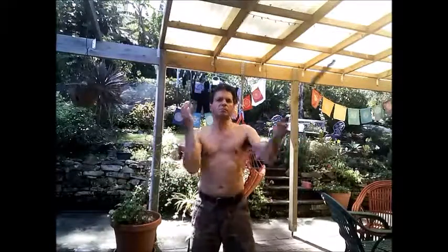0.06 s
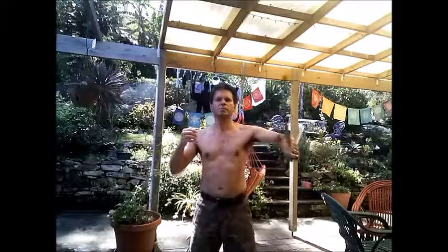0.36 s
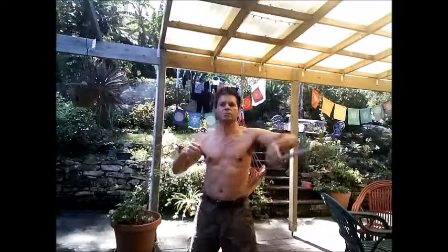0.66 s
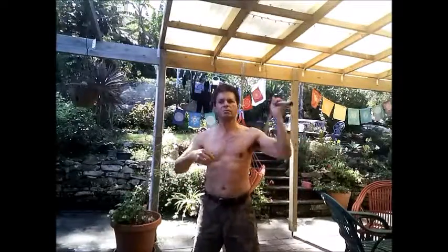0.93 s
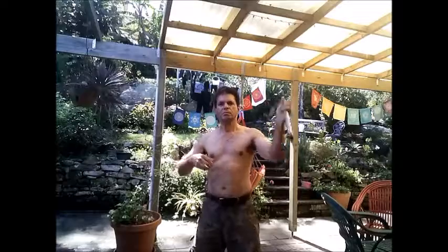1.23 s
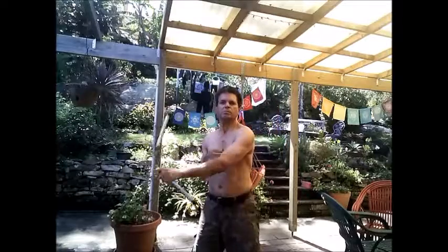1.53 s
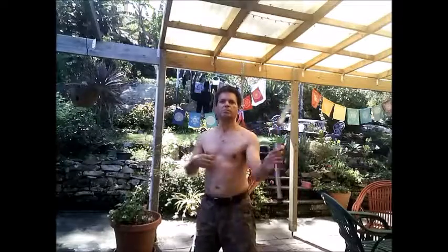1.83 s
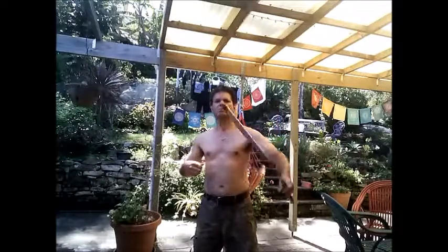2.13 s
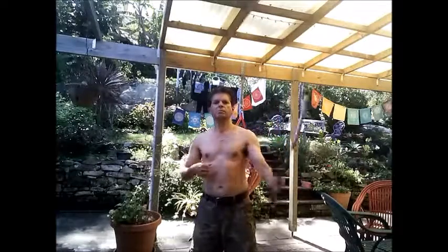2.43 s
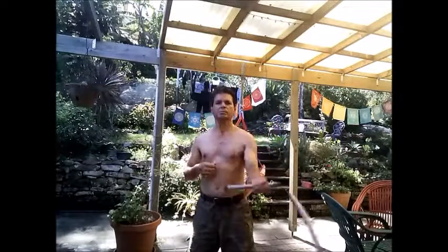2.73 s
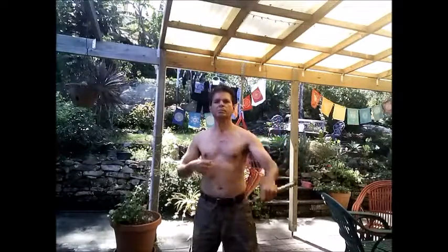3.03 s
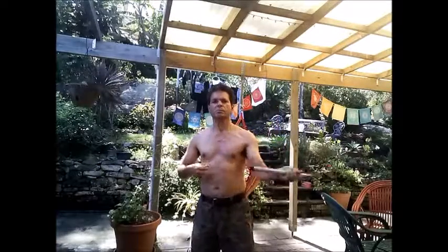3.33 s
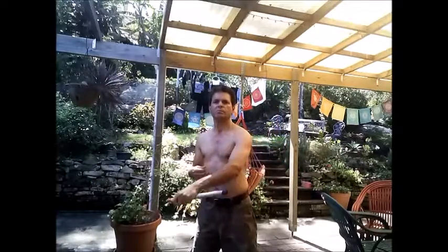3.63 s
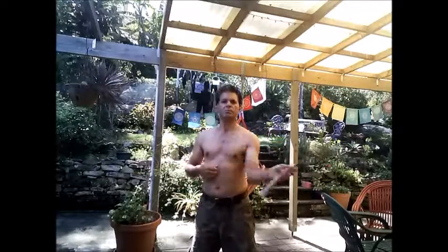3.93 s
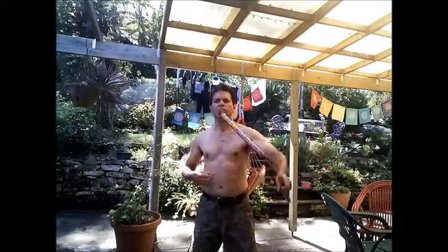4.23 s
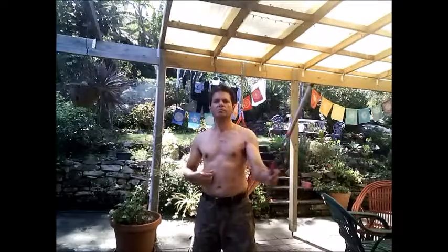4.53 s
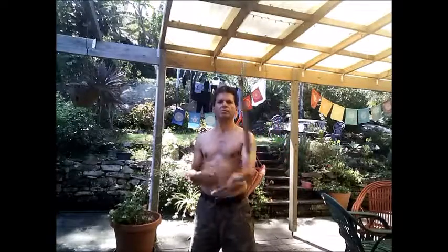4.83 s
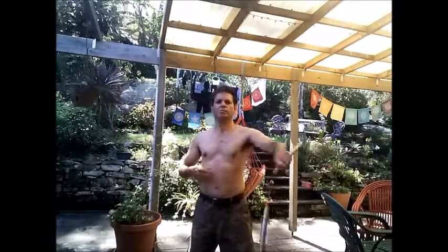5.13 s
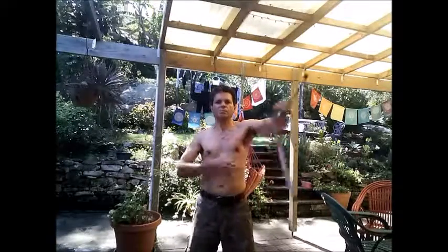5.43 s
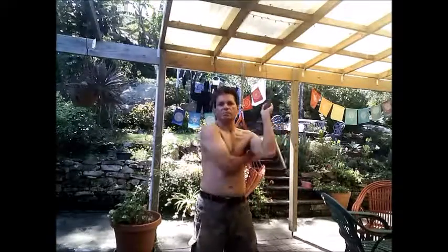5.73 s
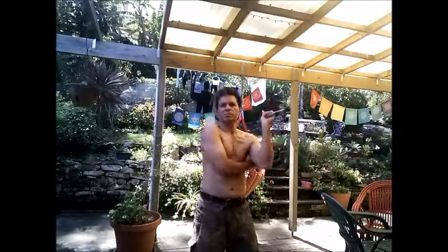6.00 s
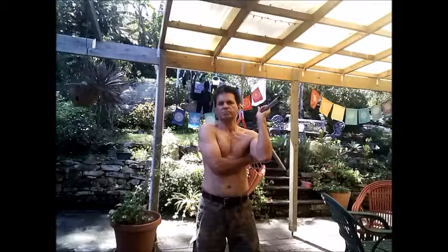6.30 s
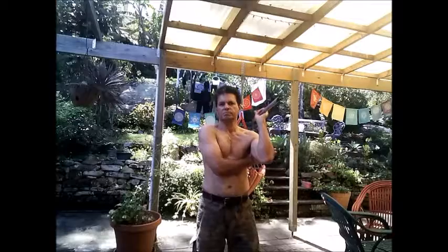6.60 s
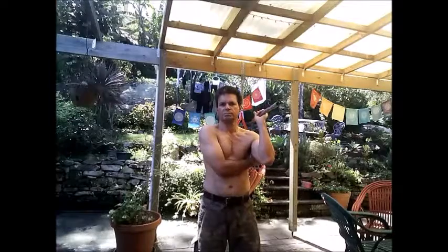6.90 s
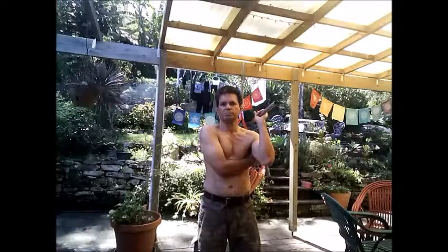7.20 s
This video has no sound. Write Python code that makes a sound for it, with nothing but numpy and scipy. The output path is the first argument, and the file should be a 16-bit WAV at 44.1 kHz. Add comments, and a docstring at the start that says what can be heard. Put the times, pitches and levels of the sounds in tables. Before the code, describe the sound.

Nunchaku are swung on a roofed garden patio, a few metres from a small microphone, with a short reverberation. From the start until about 6 seconds, the chain catches and bounces in quick, irregular clicks and gritty rattles, several each second, coloured by the wooden handles. Faint low whooshes pass at about 0.2, 1.5, 2.6, 4 and 4.8 seconds. Brief thin squeaks and faint high chirps fall in between, and soft dull pats come near 0.3 and 4.3 seconds. At 3.5 seconds the handles strike together in a sharp clack, the loudest sound, over a low thud. A second, thinner clack follows at 6 seconds. The chain gives two weak rattles around 6.3 seconds and a tiny tick at 6.7, then rests. Throughout lie a faint outdoor rumble, a low electronic hum and a slowly growing high whine.

```python
"""On a roofed garden patio, nunchaku are swung and spun a few metres from a small camera.
The chain runs out, catches and bounces, exciting the resonances of the wooden handles, which twice
clack together. Fast swings shed eddies that give a low whoosh; dull pats, thin squeaks and faint chirps
come between. The patio adds early reflections and a short reverberant tail. Beneath it all lie a faint
outdoor rumble and the hum and pulsing whine of the camera's electronics."""
import sys
import numpy as np
from scipy import signal
from scipy.fft import rfft, irfft
from scipy.io import wavfile
from scipy.ndimage import uniform_filter1d

SR = 44100
rng = np.random.default_rng(int(sys.argv[2]) if len(sys.argv) > 2 else 0)


def int16_out(signal):
    """Quantize to a 16-bit WAV file."""
    q = np.round(np.clip(np.atleast_2d(signal).T, -1, 1) * 32767)
    wavfile.write(sys.argv[1], SR, q.astype(np.int16))


N = 320166
TIME = np.arange(N) / SR
TAPS = 4096
HZ = np.fft.rfftfreq(TAPS, 1 / SR)


def amp(db):
    """The decibel law: amplitude grows tenfold for every 20 dB."""
    return 10 ** (np.asarray(db) / 20)


def unit(x):
    """Normalisation to an rms of 1."""
    return x / np.sqrt(np.mean(x ** 2) + 1e-20)


def curve(points, hz):
    """Interpolation of (Hz, value) points on a log-frequency axis."""
    point_hz, value = np.transpose(points)
    return np.interp(np.log(hz + 1), np.log(point_hz + 1), value)


def resonance(hz, width_hz):
    """A Lorentzian resonance curve of height 1."""
    return 1 / (1 + (2 * (HZ - hz) / width_hz) ** 2)


def shelf(hz, order):
    """A high-pass transition from 0 below hz to 1 above."""
    return 1 - 1 / (1 + (HZ / hz) ** order)


def add(mix, start, sound):
    """Superposition: a sound joins the mix at its start in seconds."""
    part = mix[max(round(start * SR), 0):][:len(sound)]
    part += sound[:len(part)]


def colour(x, db):
    """Minimum-phase filtering by the gain db at each of HZ: peaks ring after a blow, never before."""
    log_gain = np.log(amp(np.r_[db, db[-2:0:-1]]))
    response = np.fft.ifft(np.exp(np.conj(signal.hilbert(log_gain)))).real
    return signal.fftconvolve(x, response[:TAPS // 2])[:len(x)]


def noise(spectrum):
    """Spectral shaping of white noise, at an rms of 1."""
    gain = amp(curve(spectrum, np.fft.rfftfreq(N, 1 / SR)))
    return unit(irfft(rfft(rng.standard_normal(N)) * gain, N))


# The outdoor rumble. Each row: frequency in Hz, relative spectral density in dB.
GARDEN_SPECTRUM = [(20, -39), (40, -9), (75, 0.5), (120, -1.5), (230, -4.5), (450, -11.5), (1000, -17),
                   (2000, -20), (3700, -22), (4600, -25.5), (9000, -27), (11500, -42.5), (16000, -43)]

def garden(level_db=-57):
    """Ambient noise: steady, with its greatest density in the bass."""
    return amp(level_db) * noise(GARDEN_SPECTRUM)


# The pulsing part of the whine. Each row: frequency in Hz, relative spectral density in dB.
WHINE_SPECTRUM = [(5500, -46), (7000, -21), (7700, -16), (8250, -3), (8650, -11.5), (9000, -21),
                  (9550, -11.5), (10200, -34), (12000, -39)]
# The slow growth of the whine. Each row: time in seconds, level in dB.
WHINE_ENVELOPE = [(0, -89), (.9, -75.5), (2.5, -65.5), (3.6, -66), (6, -63.5), (7.2, -62)]

def camera(hum_hz=86.8, hum_db=-67, steady_db=-2, pulse_width=0.16):
    """Amplitude modulation: the electronics hum, and part of their high whine pulses with the hum."""
    cycles = hum_hz * TIME
    hum = amp(hum_db) * np.sqrt(2) * np.sin(2 * np.pi * cycles)
    pulse = np.exp(-(((cycles - .4) % 1 - .5) / pulse_width) ** 2)
    steady = unit(colour(rng.standard_normal(N), 20 * np.log10(resonance(8250, width_hz=800))))
    pulsing = unit(noise(WHINE_SPECTRUM) * pulse)
    whine = unit(pulsing + amp(steady_db) * steady)
    return hum + whine * amp(np.interp(TIME, *np.transpose(WHINE_ENVELOPE)))


# The patio's early reflections. Each row: mean delay in seconds, gain relative to the direct sound.
REFLECTIONS = [(.0016, 0.18), (.0043, 0.18), (.0062, 0.18), (0.013, 0.078)]
# The decay of its tail. Each row: frequency in Hz, time to fall 60 dB in seconds.
REVERB_TIMES = [(200, 0.28), (800, 0.42), (2000, 0.29), (4000, 0.28), (7000, 0.28), (14000, 0.27)]

def patio(x, tail_db, build_s=0.0084):
    """Reverberation: direct sound, early reflections and a diffuse tail, drawn anew for each call."""
    hz, t, bands = signal.stft(rng.standard_normal(4 * TAPS), SR, nperseg=256)
    decay = amp(-60 * t / curve(REVERB_TIMES, hz)[:, None])
    tail = signal.istft(bands * decay, SR, nperseg=256)[1]
    tail *= 1 - np.exp(-(TIME[:len(tail)] / build_s) ** 2)
    response = amp(tail_db) * tail / np.linalg.norm(tail)
    response[0] += 1
    for delay, gain in REFLECTIONS:
        response[round(delay * rng.uniform(.8, 1.2) * SR)] += gain
    heard = signal.fftconvolve(x, response)
    # the reflections add the same share of energy however they interfere
    return heard * np.linalg.norm(x) * np.linalg.norm(response) / np.linalg.norm(heard)


# A handle sweeping through the air. Each row: time of greatest speed in seconds, level in dB.
FAST_SWINGS = [(0.192, -52), (1.505, -49.5), (2.649, -53.5), (4, -56.5), (4.773, -52)]

def whooshes(length_s=.19, base_hz=104.1, base_db=-51, hz_per_db=3, fall=0.21, flutter=0.06):
    """Vortex shedding: a low tone that falls as the handle passes; faster swings are louder and higher."""
    out = np.zeros(N)
    passage = np.linspace(-1, 1, round(length_s * SR))
    swell = (1 + np.cos(np.pi * passage)) / np.sqrt(2)
    for middle, db in FAST_SWINGS:
        hz = base_hz + hz_per_db * (db - base_db)
        eddies = unit(uniform_filter1d(rng.standard_normal(SR), 400))[:len(passage)]
        cycles = np.cumsum(hz * (1 - fall * passage + flutter * eddies)) / SR
        add(out, middle - length_s / 2, amp(db) * np.sin(2 * np.pi * cycles) * swell)
    return out


def contact(length_s, body_db, grain_db, rise, blow=0):
    """Impact excitation: a burst of tiny uneven impacts and an optional clean blow ring a body."""
    t = np.arange(2 * TAPS) / SR
    grains = np.repeat(amp(grain_db * rng.standard_normal(len(t) // 16)), 16)
    envelope = (1 - np.exp(-t / (rise * length_s))) * np.exp(-t / length_s)
    force = rng.standard_normal(len(t)) * grains * envelope
    force[0] -= blow * np.linalg.norm(force)
    return unit(colour(force, body_db)) * np.sqrt(0.01 * SR / len(t))  # the energy of 10 ms at rms 1


# A dull pat. Each row: frequency in Hz, relative spectral density in dB.
PAT_SPECTRUM = [(60, -31), (200, -1), (420, -7), (800, -7), (2500, -17), (12000, -73)]
# Dull pats, and the low thud under the first clack. Each row: start in seconds, level in dB.
PATS = [(0.326, -49.5), (.884, -64), (3.529, -42), (4.298, -46.5), (4.776, -62)]

def pats():
    """Damped impact: a brief, low burst that dies without ringing."""
    out = np.zeros(N)
    for start, db in PATS:
        pat = contact(0.005, curve(PAT_SPECTRUM, HZ), grain_db=2, rise=0.23)
        add(out, start, amp(db) * patio(pat, tail_db=-0.5))
    return out


# Brief thin squeaks and faint, very high chirps. Each row: start in seconds, level in dB, pitch in Hz.
SQUEAKS_AND_CHIRPS = [(0.5, -47, 2400), (.763, -45, 5730), (.795, -47.5, 6430), (0.853, -49.5, 6300),
                      (1.142, -52.5, 5670), (1.321, -54, 9000), (1.46, -46, 3230), (1.464, -48.5, 1745),
                      (3.943, -43.5, 3700), (3.972, -48.5, 5740), (4.466, -68, 15400), (4.745, -47.5, 6310),
                      (5.024, -48.5, 5880), (5.246, -47.5, 6360), (5.479, -62, 10500), (5.754, -55.5, 1486),
                      (6.532, -65, 14200)]

def squeaks_and_chirps(length_s=0.023, waver_hz=260):
    """Random frequency modulation: a brief high note wavers so fast that it sounds fuzzy."""
    out, t = np.zeros(N), TIME[:round(length_s * SR)]
    for start, db, hz in SQUEAKS_AND_CHIRPS:
        waver = unit(uniform_filter1d(rng.standard_normal(TAPS), 40))[:len(t)]
        cycles = np.cumsum(hz + waver_hz * waver) / SR
        note = np.sin(2 * np.pi * cycles) * np.sin(np.pi * t / length_s)
        add(out, start, amp(db) * patio(unit(note), tail_db=-6))
    return out


# The resonances of the handles. Each row: frequency in Hz, width in Hz, lift in dB.
HANDLE_RESONANCES = [(796, 135, 17), (877, 100, 3), (1680, 34, 0.5), (1843, 160, 5), (2026, 99, 2),
                     (2432, 200, 5), (2700, 135, 4), (3270, 140, 3), (3705, 730, 4), (5310, 270, 3.5),
                     (6550, 520, 5.5)]

def handle_db():
    """Resonance: the wood lifts the same bands whether a link or the other handle shakes it."""
    return sum(db * resonance(hz, width_hz) for hz, width_hz, db in HANDLE_RESONANCES)


def hollowness(hz, hollow_db, edge_hz=1750):
    """Low shelving, in dB: the stronger the low modes, the hollower a blow sounds."""
    return hollow_db / (1 + (hz / edge_hz) ** 8)


# Struck wood. Each row: frequency in Hz, relative spectral density in dB.
WOOD_SPECTRUM = [(100, -39), (300, -25), (600, -7.5), (850, -2.5), (1200, 2), (1500, 3.5), (2800, 0.5),
                 (3900, 3), (4450, -1.5), (5300, -1), (6100, -7.5), (7300, -7), (9000, -14.5), (12500, -25),
                 (16000, -26)]

def crack(length_s, hollow_db, treble_db, ring_hz):
    """Hard impact of wood on wood: the briefer the contact, the more of it is one clean blow."""
    wood_db = curve(WOOD_SPECTRUM, HZ) + handle_db() + 5 * resonance(ring_hz, width_hz=170)
    tone_db = hollowness(HZ, hollow_db) + treble_db * shelf(4200, order=8)
    return contact(length_s, wood_db + tone_db, grain_db=0.5, rise=.08, blow=0.0012 / length_s)


# The handles' bending modes. Each row: frequency in Hz, relative level in dB, 60 dB decay in seconds.
BENDING_MODES = [(461, -20, 0.071), (612, -19, 0.23), (830, -23, .2), (950, -12, 0.21), (1020, -13, .14),
                 (1185, -12.5, 0.092), (1390, -11, 0.14), (2560, -28, 1), (3730, -26.5, 1)]
# The handles colliding. Each row: start in seconds, level in dB, contact time in seconds,
# hollowness in dB, treble in dB, ring frequency in Hz.
HANDLE_HITS = [(3.5285, -24.5, 0.0023, -1.5, 2, 4060), (6.0432, -28, 0.0064, -14, -2, 2520)]

def clacks(rebound_s=.0054, rebound_db=-6.5, rebound_hollow_db=6.5):
    """Free vibration: after a crack and a softer, hollower rebound, the handles' modes ring down."""
    out, t = np.zeros(N), TIME[:SR]
    for start, db, length_s, hollow_db, treble_db, ring_hz in HANDLE_HITS:
        blows = crack(length_s, hollow_db, treble_db, ring_hz)
        rebound = crack(length_s, hollow_db + rebound_hollow_db, treble_db, ring_hz)
        add(blows, rebound_s, amp(rebound_db) * rebound)
        add(out, start, amp(db) * patio(blows, tail_db=-3.5))
        for hz, mode_db, t60 in BENDING_MODES:
            envelope = amp(db + mode_db + hollowness(hz, hollow_db) - 60 * t / t60)
            add(out, start, envelope * np.sin(2 * np.pi * hz * t))
    return out


# A struck link. Each row: frequency in Hz, relative spectral density in dB.
LINK_SPECTRUM = [(100, -10), (560, -12.5), (810, -23), (1050, -18.5), (1400, -5), (1900, -3.5),
                 (2900, -3.5), (3950, 0), (4450, -10), (5300, -6.5), (6900, -8), (7600, -11), (9000, -17.5),
                 (12000, -31.5), (16000, -31)]

def link_db(ring_hz, ring_db, clink_db=4.5):
    """Coupled resonance: the handles, one main ring and three partials that vary from touch to touch."""
    clinks = sum(resonance(hz, width_hz=140) for hz in 1500 * 5 ** rng.random(size=3))
    ring = resonance(ring_hz, width_hz=220)
    return curve(LINK_SPECTRUM, HZ) + handle_db() + ring_db * ring + clink_db * clinks


def edge_db(bright_db, snap_db):
    """Treble shelving of a touch: brightness in the upper middle, snap at the top."""
    return bright_db * shelf(4130, order=10) + (snap_db - bright_db) * shelf(6850, order=10)


def link_tick(slip_s, bright_db, snap_db, low_hz=1700, high_hz=6500):
    """Impulse response: a briefly touched link pings more clearly than a sliding one, at a chance pitch."""
    ring_hz = low_hz * (high_hz / low_hz) ** rng.random()
    body_db = link_db(ring_hz, ring_db=16.5) + edge_db(bright_db, snap_db)
    return contact(slip_s, body_db, grain_db=1.5, rise=.15, blow=0.00087 / slip_s)


def slack_chain(count=16, from_s=0.02, to_s=6.0, level_db=-52.5):
    """Random collisions: loose links tick faintly while the handles fly."""
    out = np.zeros(N)
    for k in range(count):
        start = from_s + (to_s - from_s) * (k + rng.random()) / count
        add(out, start, amp(level_db) * link_tick(slip_s=0.0052, bright_db=4, snap_db=0))
    return patio(out, tail_db=-7.0)[:N]


def link_slip(slip_s, bright_db, snap_db, ring_hz, lead_s, scrape_db=-18.5, bite_s=0.0027):
    """Sliding friction: a faint scrape, then a gritty burst; a very short slip is nearly a clean tick."""
    body_db = link_db(ring_hz, ring_db=9.5)
    sound = amp(scrape_db) * contact(0.0049, body_db, grain_db=6.5, rise=0.23)
    rise = min(bite_s / slip_s, .25)  # the attack stays quick however long the links slide
    burst = contact(slip_s, body_db, grain_db=5.5, rise=rise, blow=0.00059 / slip_s)
    add(sound, lead_s, burst)
    return colour(sound, edge_db(bright_db, snap_db))


# The chain running out and catching. Each row: time in seconds, level in dB before the treble shelves,
# slip time in seconds, brightness in dB, snap in dB, ring frequency in Hz.
CHAIN_CATCHES = [(.018, -50, 0.019, -5, 6, 1650), (0.1257, -31, 0.003, 3, 5.5, 5590),
                 (0.17, -35.5, 0.0042, 0, -2, 3100), (.182, -36, 0.005, -10, 4, 3430),
                 (0.325, -37.5, 0.033, 4, 8, 3820), (.43, -44.5, 0.012, -9, -16, 1960),
                 (0.464, -39.5, 0.018, 3.5, 7.5, 6750), (0.524, -39, 0.054, 3, -13, 3470),
                 (0.589, -37, 0.0078, -2, -2.5, 3770), (.666, -40.5, .02, -1, -3, 1880),
                 (.717, -44, 0.058, 4, 2, 6200), (0.792, -40, 0.0015, 2, 2, 2300),
                 (.882, -37, 0.012, 0.5, 0.5, 2280), (.908, -38.5, 0.0091, -2, -3, 3720),
                 (.94, -39, 0.011, -4, -2, 2970), (1.017, -32, 0.024, 3.5, -0.5, 3150),
                 (1.225, -47.5, 0.015, -7, 3, 3660), (1.443, -41, 0.03, 3.5, 3, 1910),
                 (1.467, -40, .0065, -26, -23, 1710), (1.519, -42, 0.0012, 0, 7.5, 4770),
                 (1.531, -34.5, 0.013, 3, -1, 4670), (1.547, -35, 0.0074, -1, 3.5, 2070),
                 (1.838, -37, 0.0044, 2, 0.5, 2250), (1.875, -39, 0.039, 0, 2, 3870),
                 (2.067, -41.5, 0.055, -7, -4, 3150), (2.0968, -39, 0.0018, 6, 7, 5200),
                 (2.154, -42.5, 0.0024, -5, 7, 3900), (2.233, -41, 0.047, 1.5, 2, 2460),
                 (2.349, -35.5, 0.018, -7, 2.5, 3600), (2.404, -43, 0.015, 3, -24, 2700),
                 (2.508, -34.5, 0.0075, -1, 4, 3970), (2.661, -39.5, 0.016, 0, 3.5, 5400),
                 (2.773, -51.5, 0.0068, -1, -2, 3340), (2.872, -35.5, 0.0057, 0, 2, 3200),
                 (2.9736, -43, 0.0035, 2, 8, 3760), (2.983, -42, 0.0015, 10, -28, 4050),
                 (3.116, -50, 0.039, -1, 3, 6430), (3.185, -39, 0.0076, -0.5, 8, 5430),
                 (3.233, -42, .005, 1.5, 14.5, 2400), (3.251, -35.5, 0.021, 1, 0, 2330),
                 (3.31, -48, 0.0014, 11, -1, 5430), (3.366, -36.5, 0.0099, 3.5, 3, 3030),
                 (3.462, -38.5, 0.011, 1.5, 5, 2940), (3.665, -35.5, .016, 3, 1.5, 2400),
                 (3.723, -35, 0.014, 0.5, 2.5, 6700), (3.783, -39.5, .028, -1.5, 5, 3550),
                 (3.906, -43.5, 0.0026, 2, -12, 3440), (3.93, -37, 0.0098, 3, 7, 3540),
                 (4.12, -45.5, 0.0026, -10, -19, 1660), (4.212, -35, 0.014, 3, 4, 2110),
                 (4.241, -41.5, 0.00071, 11, 7, 3890), (4.294, -40.5, 0.018, 1, 14, 2140),
                 (4.324, -37, 0.018, 7, 5, 1990), (4.378, -35, .0057, -3, -4, 2380),
                 (4.41, -37, 0.059, 1, 4, 2410), (4.488, -46.5, 0.0082, -4, -10, 2960),
                 (4.518, -48, 0.0015, 8, 0, 5280), (4.641, -45, 0.0082, 4, -1, 2630),
                 (4.662, -43.5, 0.0039, -7, -2, 2580), (4.771, -34.5, 0.013, 6, 7, 2310),
                 (4.835, -44.5, 0.0037, -1, -18, 3950), (4.893, -39, .0095, -2.5, -2, 2490),
                 (4.996, -39, 0.0043, 2, 0, 6100), (5.016, -37.5, 0.0057, -5.5, 6.5, 5700),
                 (5.104, -45.5, .01, 2, -18, 3270), (5.252, -42.5, 0.004, -5, 2, 6160),
                 (5.273, -37.5, 0.057, -2, -2, 3820), (5.561, -43, 0.016, 5, 0, 1630),
                 (5.657, -40, 0.012, 2.5, 5, 2610), (5.709, -44, 0.073, -3.5, 4, 3000),
                 (5.866, -45.5, 0.01, -1, 4.5, 2100), (5.908, -43, 0.029, -1, 0, 2570),
                 (5.938, -42, 0.0094, 2, 1, 2000), (6.231, -47, 0.027, 2, 3, 5430),
                 (6.28, -49.5, 0.02, 4, 0, 2540), (6.715, -60, 0.0021, -11, -8, 2590)]

def chain(lead_s=.005, bounces=2, gap_s=0.016, bounce_db=-8, fall_db=-3.5):
    """Inelastic collision: at each catch the links slip once, then bounce, each time more faintly."""
    out = np.zeros(N)
    for catch_s, db, slip_s, bright_db, snap_db, ring_hz in CHAIN_CATCHES:
        rattle = link_slip(slip_s, bright_db, snap_db, ring_hz, lead_s)
        delays = lead_s + np.cumsum(gap_s * (.5 + rng.random(size=bounces)))
        for k, delay in enumerate(delays):
            tick = link_tick(slip_s=.002, bright_db=bright_db + 3, snap_db=snap_db - 2)
            add(rattle, delay, amp(bounce_db + k * fall_db) * tick)
        add(out, catch_s - lead_s, amp(db) * patio(rattle, tail_db=-5.0))
    return out


def scene():
    """Superposition: all the sources sum in one channel."""
    mix = garden() + chain() + slack_chain() + clacks() + pats() + squeaks_and_chirps()
    return (mix + whooshes() + camera())[None]


def record(dry, peak_db=15, peak_hz=15100, cutoff_hz=15650):
    """Transducer resonance: the small microphone rings at the very top, just under its band limit."""
    heard = colour(dry[0], peak_db * resonance(peak_hz, width_hz=1300))
    lowpass = signal.firwin(511, cutoff_hz, window=("kaiser", 9), fs=SR)
    return signal.oaconvolve(heard, lowpass, "same")[None]


dry = scene()
out = record(dry)
int16_out(out)
```